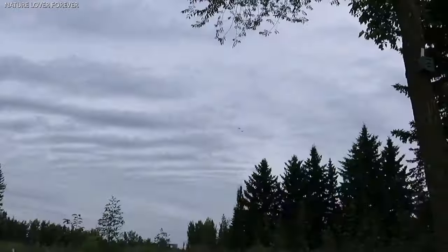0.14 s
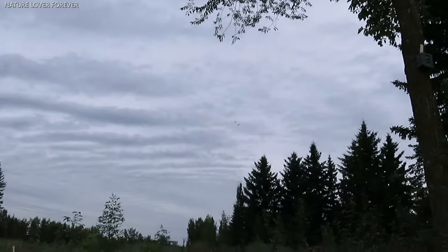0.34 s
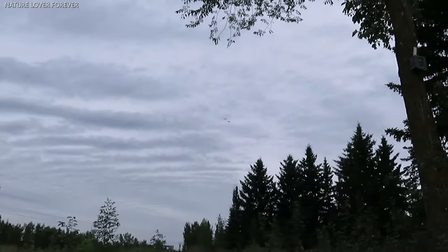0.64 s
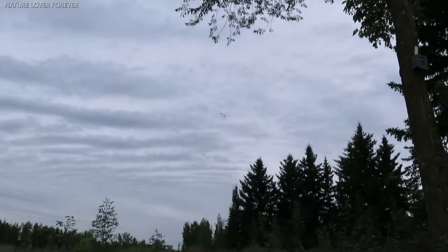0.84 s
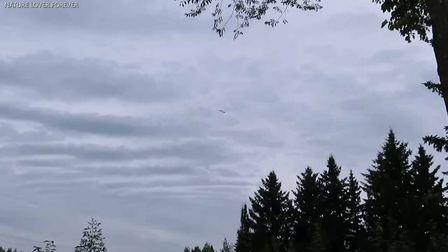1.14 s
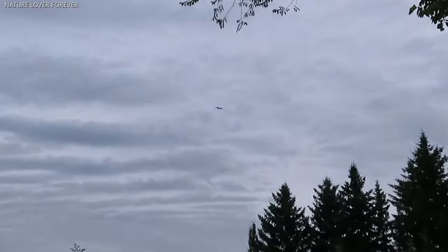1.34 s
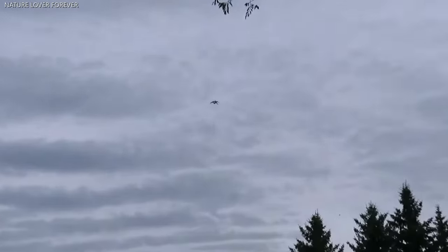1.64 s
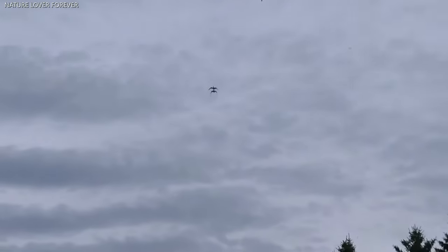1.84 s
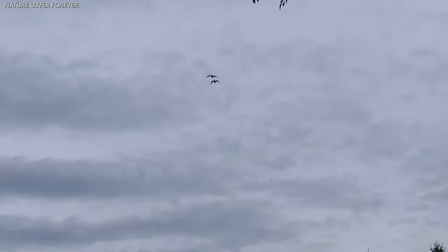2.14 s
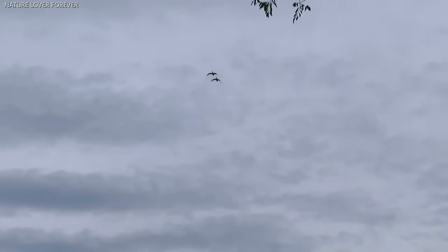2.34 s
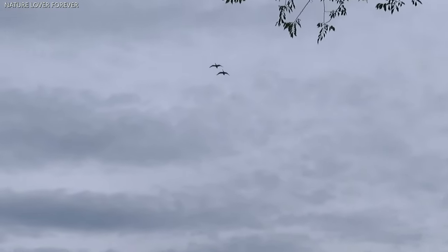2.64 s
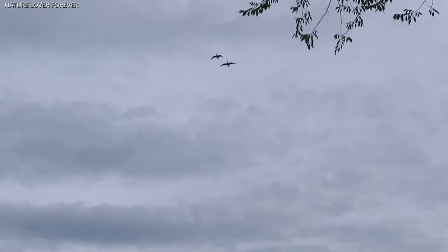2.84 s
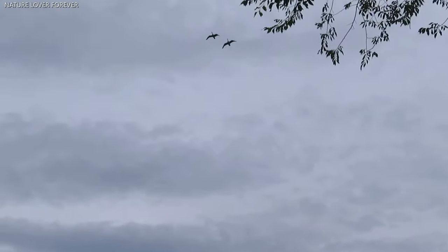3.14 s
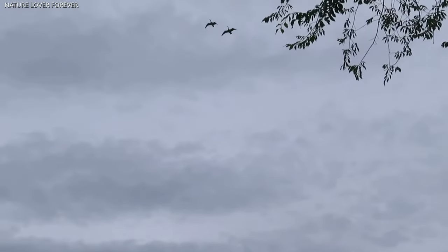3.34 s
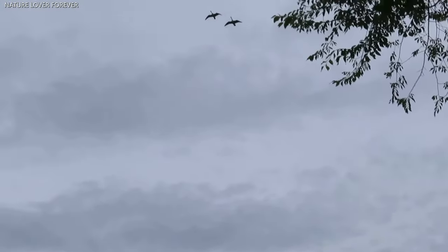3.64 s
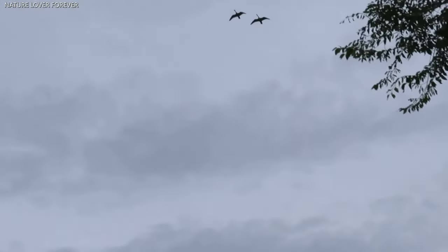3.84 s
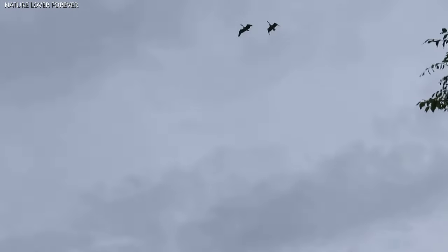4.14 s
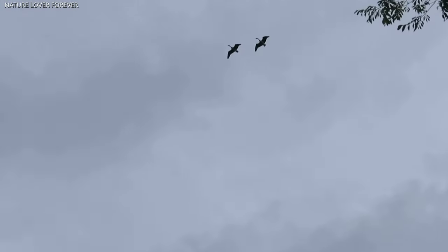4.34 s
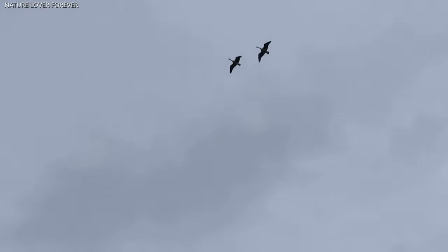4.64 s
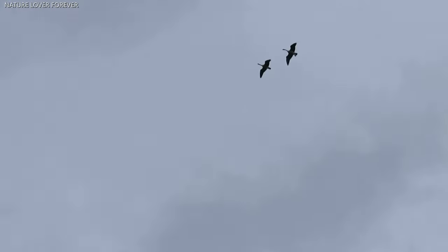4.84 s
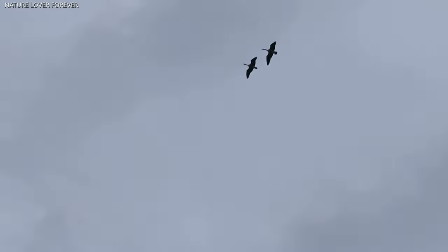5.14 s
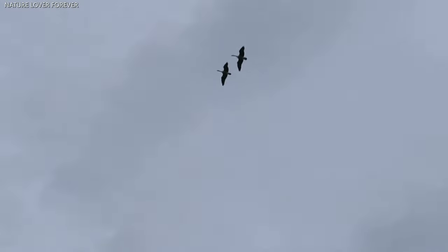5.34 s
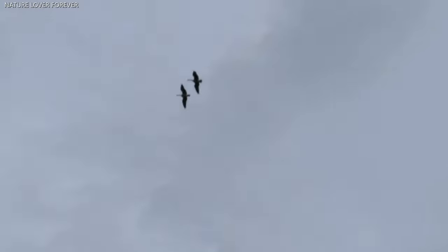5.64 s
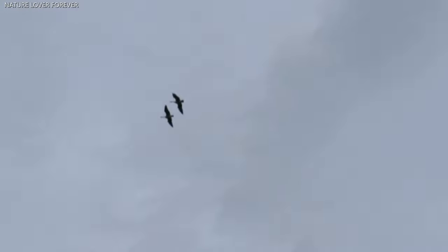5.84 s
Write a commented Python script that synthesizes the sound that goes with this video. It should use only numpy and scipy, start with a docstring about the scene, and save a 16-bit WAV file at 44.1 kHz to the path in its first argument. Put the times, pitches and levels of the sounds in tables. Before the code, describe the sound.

Rapid, brassy two-note goose honks from a passing pair drift from right to left, with nasal calls and one hoarse squawk over faint rumble.

```python
"""A low rumble, a steady wash and a distant motor's wavering hum, all shaped noise or tone, fade in.
A bird puts in nasal calls, two voices chopping one air stream; then two geese fly over, honking in turn.
Each honk, one goose lower than the other, opens low, breaks with a rattle and leaps to a drooping top note.
Midway comes one hoarse squawk; meanwhile the birds cross from right to left.
Leaves smear every call and trees return it as a faint tail, both made by convolution with shaped noise."""
import sys
import numpy as np
from scipy import signal
from scipy.fft import rfft, irfft, next_fast_len
from scipy.io import wavfile
from scipy.ndimage import map_coordinates

SR = 44100
rng = np.random.default_rng(int(sys.argv[2]) if len(sys.argv) > 2 else 0)


def dump(signal):
    """Clip the signal to [-1, 1] and save it as 16-bit WAV at the path in sys.argv[1]."""
    limited = np.clip(np.atleast_2d(signal).T, -1, 1)
    pcm = np.round(limited * 32767).astype(np.int16)
    wavfile.write(sys.argv[1], SR, pcm)


N = 263277
TIME = np.arange(N) / SR

# Relative spectrum of the outdoor noise: (f/Hz, level/dB)
AIR_SPECTRUM = [(15, -40), (25, -10.5), (45, 1.5), (80, 0.5), (130, -3), (200, -7.5), (320, -11),
                (600, -9.5), (900, -10.5), (1550, -16), (1900, -26.5), (4000, -34), (8000, -42.5),
                (15000, -52.5)]
# Stereo difference of diffuse noise: (f/Hz, side-minus-mid level/dB)
SIDE_SPECTRUM = [(30, -11.5), (70, -34.5), (150, -14.5), (400, -10), (1200, -19.5), (3000, -1), (8000, -5),
                 (15000, -14)]
# Rumble, before trim and gusts: (t/s, level/dB)
RUMBLE_LEVEL = [(0.2, -38.5), (0.37, -43.5), (5.61, -42.5), (5.95, -40)]
# Motor hum, before its wavering: (t/s, level/dB)
HUM_LEVEL = [(0, -42), (2, -61.5), (4.3, -58.5), (4.9, -51.5), (5.97, -46.5)]
# Opening of the sound: (silent until t/s, full from t/s)
FADE_IN_TIMES = (0.14, 0.18)
# Relative spectrum returned by the trees: (f/Hz, level/dB)
TREE_SPECTRUM = [(200, -6.5), (600, -6), (1200, -1.5), (1570, -2.5), (1800, -5.5), (4500, -4.5),
                 (9000, -10)]
# Spectrum scattered by nearby leaves: (f/Hz, level/dB)
LEAF_SPECTRUM = [(500, -41.5), (1600, -26.5), (2500, -13.5), (4500, -7.5), (9000, -6)]
# Bearing of the birds: (t/s, left-minus-right level/dB)
FLIGHT_PATH = [(.6, -1.1), (2.0, -0.5), (3.6, -0.5), (4.7, 2.5), (5.8, 3.5)]
# Two-voiced calls: (start t/s, end t/s, lower voice at crest f/Hz, upper voice at crest f/Hz,
# crest level/dB before flutter)
NASAL_CALL_TABLE = [ (.158, 0.285, 935, 1534, -42.5), (0.324, 0.418, 879, 1540, -40),
                    (1.039, 1.105, 880, 1530, -58), (1.852, 1.923, 891, 1520, -41.5),
                    (2.125, 2.209, 892, 1550, -32.5), (2.352, 2.441, 950, 1542, -33.5),
                    (2.475, 2.566, 898, 1510, -34.5), (2.794, 2.861, 878, 1383, -37.5),
                    (3.655, 3.747, 860, 1540, -34), (3.938, 4.022, 877, 1464, -38),
                    (4.198, 4.291, 938, 1509, -34), (5.141, 5.233, 830, 1360, -34),
                    (5.480, 5.55, 842, 1590, -35.5)]
# Throat resonances of the nasal caller: (f/Hz, level/dB)
NASAL_THROAT_SPECTRUM = [(300, -23.5), (850, -3.5), (1300, 6.5), (1700, 0), (1950, 5.5), (2450, -3),
                         (3200, -13), (4300, -5.5), (5200, -10.5), (7000, -15.5), (11000, -37)]
# Honks: (start t/s, register break t/s, end t/s, opening f/Hz, top-note crest f/Hz,
# base level/dB before effort and throat, rasp of the low note: 0 clear, 1 and above hoarse)
HONK_TABLE = [ (.585, 0.644, .682, 499, 734, -25, 1.14), (.860, 0.92, .950, 446.5, 711, -27.5, 0.14),
              (.924, 0.967, .996, 534.4, 749, -24.5, .25), (1.130, 1.165, 1.218, 452.3, 694, -27.5, .95),
              (1.260, 1.308, 1.348, 534.5, 791, -24, 0.41), (1.472, 1.542, 1.565, 473.6, 650, -25.5, 0.1),
              (1.61, 1.636, 1.695, 727, 774.4, -23.5, 0.78), (1.862, 1.94, 1.975, 458.3, 702, -25.5, 0.11),
              (1.959, 1.986, 2.038, 526, 775, -22.5, .8), (2.195, 2.27, 2.300, 473, 697, -24.5, 0.28),
              (2.285, 2.311, 2.360, 524.3, 783, -22, 0.53), (2.495, 2.541, 2.585, 451, 697, -25, 0.22),
              (2.601, 2.643, 2.692, 522, 792, -21, 0.4), (2.952, 2.989, 3.040, 520.4, 789, -21.5, .35),
              (3.135, 3.184, 3.233, 491.6, 704, -23, 1.38), (3.286, 3.323, 3.378, 522, 791, -22.5, .4),
              (3.512, 3.604, 3.630, 455.2, 713, -23, 0.041), (3.598, 3.627, 3.680, 536.5, 805.6, -19, 1.2),
              (3.896, 3.936, 3.985, 534.8, 795.6, -20.5, 0.55), (4.11, 4.174, 4.215, 462, 710, -24, 0.26),
              (4.323, 4.355, 4.415, 665, 774, -19.5, 2.06), (4.513, 4.596, 4.630, 471.7, 697, -23.5, 0.23),
              (4.683, 4.719, 4.770, 523, 786.4, -20.5, 0.64), (4.924, 4.974, 5.015, 457.3, 693, -23, 0.2),
              (5.059, 5.088, 5.145, 709, 786, -21, 0.76), (5.241, 5.314, 5.360, 439.3, 680.5, -24.5, 0.16),
              (5.411, 5.442, 5.502, 694.4, 775, -21, 1.07), (5.612, 5.655, 5.708, 452.7, 695, -24.5, 1.04),
              (5.781, 5.845, 5.875, 539.6, 759, -21, .4)]
# Windpipe and beak resonances of a goose: (f/Hz, level/dB)
GOOSE_THROAT_SPECTRUM = [(330, -15), (480, -7.5), (700, -1.5), (820, -9.5), (1020, 0.5), (1350, 3.5),
                         (1620, 0.5), (1760, -3), (2080, -4.5), (2400, -10), (3050, -17.5), (3600, -14.5),
                         (4700, -14), (5600, -21.5), (7000, -30.5), (11000, -56)]
# Base treble of a honk by the time of its break: (t/s, level/dB)
OVERTONE_LEVEL = [(.64, 3), (.95, -9), (1.92, -9.5), (1.99, 5.5), (2.55, -2.5), (3.3, -1.5), (4.4, 3),
                  (5.35, 1.5), (5.7, 7)]

TOP_HZ = 15300  # upper band limit
# Lag of the left ear behind the right
LAG_AHEAD_SAMPLES, LAG_SAMPLES_PER_DB = .7, -.7
# Two voices: equal at this lower pitch; the upper gains as the lower is forced up
EVEN_VOICES_HZ, TAKEOVER_DB_PER_HZ = 898.4, 0.28
# Hoarse squawk
SQUAWK_START_S, SQUAWK_END_S, SQUAWK_HZ, SQUAWK_DB = 2.828, 2.93, 699, -26.5
# Honk pitch: the low note climbs part of the way; the longer the top note, the further it droops
LOW_CLIMB_SHARE, LEAP_S, DROOP_S, DROOP_SHARE_PER_S, TOP_CLIMB = .235, 0.0063, 0.0335, 2.5, .45
# Honk loudness: rasp weakens the low note
RASP_COST_DB, SWELL_DB, SAG_DB, ATTACK_S, RELEASE_S = -6.5, 9, 11.5, .014, 0.012
SWELL_PEAK = 0.88  # share of the low note at which it is loudest
# Push: a higher top note is louder and brighter, a longer one louder
USUAL_TOP_HZ, USUAL_TOP_S = 750, .046
TOP_NOTE_DB, PUSH_DB_PER_HZ, PUSH_DB_PER_S, BRIGHT_DB_PER_HZ = -2.5, 0.0138, 85.5, 0.0392
# Roughness: a rattle at the break dies away, leaving the top note almost clear
BREAK_S, BREAK_RASP, SETTLE_S, SETTLE_RASP, TOP_RASP = 0.0061, 0.58, 0.0096, 0.21, 0.045


def undb(db):
    """Amplitude gain is the exponential of a level in decibels."""
    return np.exp(np.asarray(db) * np.log(10) / 20)


def unit(x):
    """Normalisation divides a signal by its rms value."""
    return x / np.sqrt(np.mean(x ** 2) + 1e-18)


def curve(table):
    """Linear interpolation gives a tabulated quantity at every sample."""
    return np.interp(TIME, *np.transpose(table))


def shape(points, hz):
    """A spectrum in decibels is interpolated over logarithmic frequency, then turned into gain."""
    f, db = np.transpose(points)
    return undb(np.interp(np.log(hz + 1), np.log(f), db))


def colour(x, points):
    """Linear filtering multiplies the Fourier spectrum by a gain curve."""
    size = next_fast_len(x.shape[-1])
    hz = np.arange(size // 2 + 1) * SR / size
    return irfft(rfft(x, size) * shape(points, hz), size)[..., :x.shape[-1]]


def walk(rate, size):
    """Random wander of spread near 1 joins `rate` Gaussian values a second by straight lines."""
    steps = rng.standard_normal(1024)
    return 1.2 * np.interp(np.arange(size) * rate / SR, np.arange(len(steps)), steps)


def smooth(u):
    """A squared sine gives an S-shaped step from 0 to 1."""
    return np.sin(np.pi / 2 * np.clip(u, 0, 1)) ** 2


def phase_of(hz):
    """Phase is the running integral of instantaneous frequency."""
    return 2 * np.pi * np.cumsum(hz) / SR


def add(out, start, sound):
    """Superposition sums a sound into the mixture at its start time."""
    i = max(int(start * SR), 0)
    out[i:i + len(sound)] += sound[:max(len(out) - i, 0)]


def stereo_noise(size):
    """Mid and side noises fix the likeness of the channels, which differ most in the treble."""
    mid, side = rng.standard_normal((2, size))
    return mid + colour(side, SIDE_SPECTRUM) * np.array([[1], [-1]])


def motor_hum(hum_hz=78.9):
    """A distant motor is a sinusoid whose frequency and level waver."""
    tone = np.sqrt(2) * np.sin(phase_of(hum_hz * (1 + 0.012 * walk(4.9, N))))
    return tone * undb(curve(HUM_LEVEL) + 2 * walk(5.5, N))


def background(rumble_db=-0.6, gust_db=0.26, split_hz=300, wash_db=-46):
    """Broadband noise divides into a gusty rumble and a far-off wash, over which lies a hum."""
    air = colour(stereo_noise(N), AIR_SPECTRUM)
    low = signal.sosfiltfilt(signal.butter(2, split_hz, fs=SR, output="sos"), air)
    rumble = unit(low) * undb(curve(RUMBLE_LEVEL) + rumble_db + gust_db * walk(6, N))
    wash = unit(air - low) * undb(wash_db + 0.47 * walk(9.7, N))
    return rumble + wash + motor_hum()


def tree_echo(calls, t60_s=1.13, build_s=0.043, wet_db=-20.0, patchy_db=4):
    """Multiple scattering by trunks and crowns gives an uneven, exponentially decaying tail."""
    t = TIME[:SR]
    tail = smooth(t / build_s) * undb(-60 * t / t60_s + patchy_db * walk(45.3, len(t)))
    reply = unit(colour(stereo_noise(len(t)) * tail, TREE_SPECTRUM)) / np.sqrt(len(t))
    return undb(wet_db) * signal.fftconvolve(calls[None], reply, axes=1)[:, :N]


def leaf_scatter(calls, t60_s=.1):
    """Short-path scattering by foliage smears mainly the treble, differently for each ear."""
    t = TIME[:4096]
    reply = unit(rng.standard_normal((2, len(t))) * undb(-60 * t / t60_s)) / np.sqrt(len(t))
    return signal.oaconvolve(calls[None], colour(reply, LEAF_SPECTRUM), axes=1)[:, :N]


def fly_past(calls):
    """Bearing, moving from right to left, sets the level and arrival time at each ear."""
    pan_db = curve(FLIGHT_PATH)
    lag = LAG_AHEAD_SAMPLES + LAG_SAMPLES_PER_DB * pan_db
    ears = []
    for ear in (1, -1):  # left, right
        delayed = map_coordinates(calls, [np.arange(N) - ear * lag / 2], order=3)
        ears.append(undb(ear * pan_db / 2) * delayed)
    return np.array(ears)


def nasal_bird(droop=0.092, crest=.3, jitter=0.011, lower_drive=3.2, upper_drive=2.12,
               attack_s=0.0083, release_s=0.028, hiss_db=-11, flutter_db=2, sag_db=6.0):
    """Two sides of a syrinx chop one air stream nonlinearly, so sum and difference tones arise."""
    out = np.zeros(N)
    for start, end, lower_hz, upper_hz, db in NASAL_CALL_TABLE:
        t = np.arange(0, end - start, 1 / SR)
        size = len(t)
        slack = ((t / t[-1] - crest) / (1 - crest)) ** 2  # pitch and level sag together
        bend = 1 - droop * slack
        lower = np.cos(phase_of(lower_hz * bend * (1 + jitter * walk(600, size))))
        upper = np.cos(phase_of(upper_hz * bend * (1 + jitter * walk(600, size))))
        upper_share = 1 / (1 + undb(TAKEOVER_DB_PER_HZ * (EVEN_VOICES_HZ - lower_hz)))
        lower_block = (lower_drive * (1 - upper_share)) ** 2 * 2 * (1 - lower)
        upper_block = (upper_drive * upper_share) ** 2 * (1 - upper)
        flow = 1 / (1 + lower_block + upper_block)
        hiss = undb(hiss_db) * rng.standard_normal(SR // 4)[:size]
        source = unit(flow - flow.mean()) + hiss
        gate = smooth(t / attack_s) * smooth((t[-1] - t) / release_s)
        loudness = undb(db - sag_db * slack + flutter_db * walk(250, size)) * gate
        add(out, start, loudness * unit(colour(source, NASAL_THROAT_SPECTRUM)))
    return out


def syrinx(hz, rasp, throb_cycles, treble_db, jitter=0.0051, rasp_jitter=0.0312,
           overtones_db=-14.0, third_db=2, hiss_db=-11.0, shimmer_db=3.5, skew=0.248, blur=0.21,
           rasp_blur=0.35, throb_wander=.12, quaver_db=1.3):
    """Two strong harmonics, shimmering overtones and hiss are modulated subharmonically by rasp."""
    size = len(hz)
    hz = hz * (1 + jitter * walk(273, size) + rasp_jitter * rasp * walk(609.7, size))
    phase = phase_of(hz)
    depth = np.tanh(rasp)
    throb_hz = hz / throb_cycles * (1 + throb_wander * walk(197, size))
    throb = (1 + depth * np.cos(phase_of(throb_hz))) / np.sqrt(1 + depth ** 2 / 2)
    voice = np.cos(phase) + np.sin(2 * phase)
    for k in range(3, 17):
        db = overtones_db + third_db * (k == 3) + treble_db * min(k / 4, 1)
        db = db + shimmer_db * walk(137.7, size)
        wander = (blur + rasp_blur * depth) * walk(180, size)
        voice = voice + undb(db) * np.cos(k * phase + skew * k ** 2 + wander)
    # air noise pulses with the fundamental
    hiss = rng.standard_normal(SR // 4)[:size] * (1 + np.cos(phase))
    hiss = hiss * (.5 + rasp) * undb(hiss_db + treble_db)
    return (voice + hiss) * throb * undb(quaver_db * walk(113, size))


def squawk(rasp=1.6, scoop=0.16, scoop_s=0.012, fade_db_per_s=210, bright_db=0.5,
           brighten_db_per_s=110, edge_s=0.0069):
    """Strong subharmonic modulation makes a call hoarse as it scoops up, brightens and fades."""
    t = np.arange(0, SQUAWK_END_S - SQUAWK_START_S, 1 / SR)
    hz = SQUAWK_HZ * (1 - scoop * np.exp(-(t / scoop_s) ** 2 / 2))
    gate = smooth(t / edge_s) * smooth((t[-1] - t) / edge_s)
    loudness = undb(SQUAWK_DB - fade_db_per_s * t ** 2 / t[-1])
    return syrinx(hz, rasp, 3.3, bright_db + brighten_db_per_s * t) * gate * loudness


def honk(start, snap, end, open_hz, top_hz, db, low_rasp, break_bright_db=3, low_dull_db=4,
         effort_bright=0.48, clearing=0.7, onset_rasp=0.25):
    """A register break joins a rising low note to an arched top note through a brief rattle."""
    t = np.arange(start - ATTACK_S / 2, end + RELEASE_S / 2, 1 / SR)
    top_s = end - snap
    upper = smooth((t - snap) / LEAP_S + .5)  # 0 in the low register, 1 in the high one
    lower = 1 - upper
    along = np.clip((t - start) / (snap - start), 0, 1)  # 0 at the start, 1 at the break
    rise = smooth(along / .9)
    arch = (t - end) / DROOP_S + 1  # 0 at the crest of the top note, 1 at its end

    low_pitch = open_hz + LOW_CLIMB_SHARE * (top_hz - open_hz) * rise
    bow = np.minimum(np.abs(arch) ** 2.4, 2) * np.where(arch < 0, TOP_CLIMB, 1)
    top_pitch = top_hz * (1 - DROOP_SHARE_PER_S * top_s * bow)
    pitch = low_pitch * lower + top_pitch * upper

    breaking = np.exp(-.5 * ((t - snap + 0.0024) / BREAK_S) ** 2)
    opening_rasp = low_rasp * (1.2 - clearing * rise) + onset_rasp * (1 - rise)
    top_rasp = TOP_RASP + SETTLE_RASP * np.exp(-np.abs(t - snap) / SETTLE_S)
    rasp = opening_rasp * lower + top_rasp * upper + BREAK_RASP * breaking

    swell_db = -SWELL_DB * (1 - along / SWELL_PEAK) ** 2
    sag_db = -SAG_DB * np.clip(arch, 0, 2) ** 2
    effort_db = swell_db * lower + sag_db * upper
    extra_hz = top_hz - USUAL_TOP_HZ
    push_db = TOP_NOTE_DB + PUSH_DB_PER_HZ * extra_hz + PUSH_DB_PER_S * (top_s - USUAL_TOP_S)
    bright_db = np.interp(snap, *np.transpose(OVERTONE_LEVEL)) + BRIGHT_DB_PER_HZ * extra_hz
    treble_db = bright_db + effort_bright * effort_db + break_bright_db * breaking - low_dull_db * lower

    # the membranes throb every third cycle of the low note and every fourth of the top note
    throb_cycles = 3 + upper
    gate = smooth((t - t[0]) / ATTACK_S) * smooth((t[-1] - t) / RELEASE_S)
    loudness = undb(db + RASP_COST_DB * low_rasp * lower + push_db * upper + effort_db)
    return t[0], syrinx(pitch, rasp, throb_cycles, treble_db) * gate * loudness


def geese(geese_db=.5):
    """Source and filter: the pair's syrinx sounds pass through the resonances of windpipe and beak."""
    out = np.zeros(N)
    for row in HONK_TABLE:
        add(out, *honk(*row))
    add(out, SQUAWK_START_S, squawk())
    return undb(geese_db) * colour(out, GOOSE_THROAT_SPECTRUM)


def scene():
    """Direct, scattered and echoed calls superpose on the open air."""
    calls = geese() + nasal_bird()
    return fly_past(calls) + leaf_scatter(calls) + tree_echo(calls) + background()


def record(dry):
    """A quick fade-in precedes an elliptic low-pass filter that limits the band."""
    faded = dry * np.interp(TIME, FADE_IN_TIMES, (0, 1))
    return signal.sosfilt(signal.ellip(8, .2, 70, TOP_HZ, fs=SR, output="sos"), faded)


dry = scene()
out = record(dry)
dump(out)
```